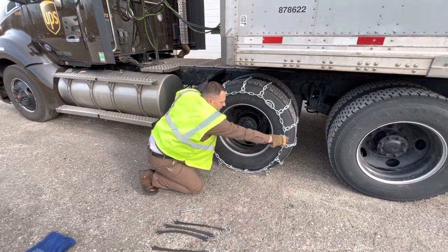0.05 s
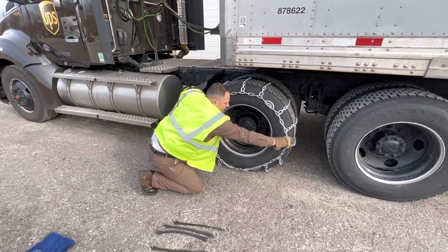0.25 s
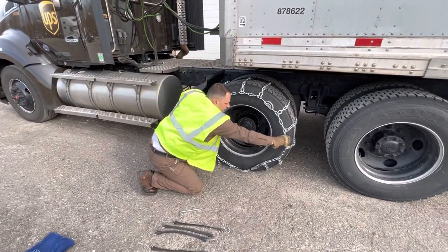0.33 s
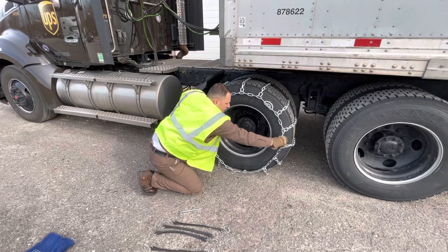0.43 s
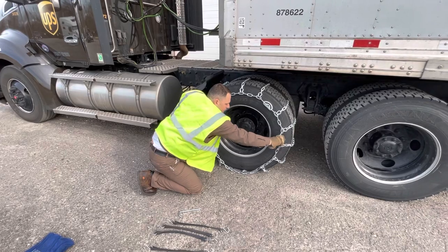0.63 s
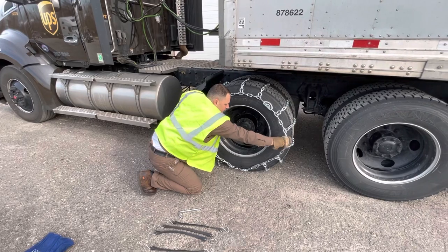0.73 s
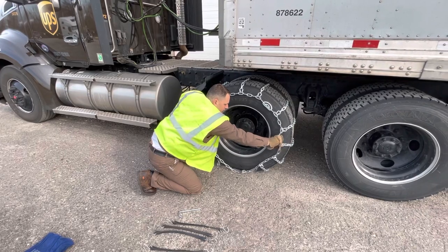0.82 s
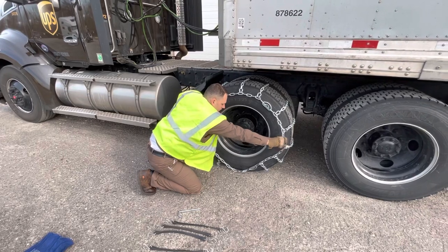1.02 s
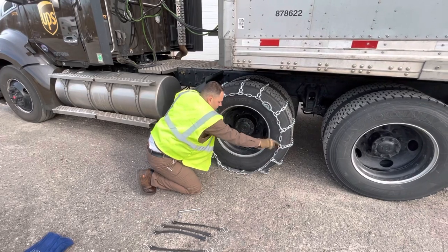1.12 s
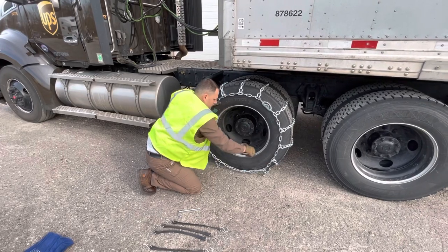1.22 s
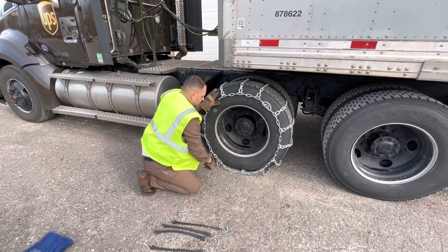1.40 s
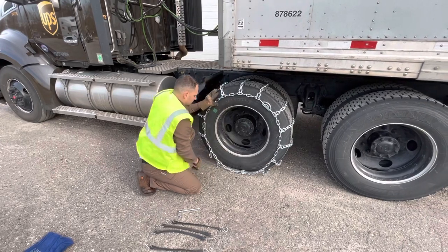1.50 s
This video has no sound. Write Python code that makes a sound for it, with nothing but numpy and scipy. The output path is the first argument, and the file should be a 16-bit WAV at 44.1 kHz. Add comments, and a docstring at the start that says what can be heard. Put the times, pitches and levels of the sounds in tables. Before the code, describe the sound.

A steel chain rattles against a truck tyre. After faint ticks, bright, dense link clashes start near 0.2 seconds and come in uneven bursts, with fine grating and hollow rubber thumps. The brightest ringing jangles come around 0.77 and 1.0 seconds. After 1.1 it slackens: light clinks near 1.2 and 1.3, thin pings fading. Outdoors, close, with short reflections and a faint low rumble.

```python
"""Outdoors, beside a truck: a steel snow chain is tugged along the side of a tyre.
Links clash in short flurries of contacts: noise bursts that also set off decaying ringing tones.
The links grate and rattle finely (many tiny contacts), and loose ones sing on as swelling, fading sines.
The chain slaps the rubber: soft pushes make the tyre's low tones thump, with a short knock of noise.
Under it lies a low rumble of filtered noise; reflections are a fading tail of noise."""
import sys
import numpy as np
from scipy import signal
from scipy.fft import rfft, irfft
from scipy.io import wavfile

SR = 44100
rng = np.random.default_rng(int(sys.argv[2]) if len(sys.argv) > 2 else 0)


def to_wav(s):
    """Save 16-bit WAV."""
    ch = np.atleast_2d(s).T  # columns
    pcm = np.round(np.clip(ch, -1, 1) * 32767)  # PCM
    wavfile.write(sys.argv[1], SR, pcm.astype(np.int16))


N = 68355  # length of the scene [samples]

# ringing tones of the steel links: (frequency [Hz], relative level [dB])
LINK_MODES = [(3550, -2), (4576, -3), (5078, -2), (7434, -9), (7747, -5), (8326, 1), (9070, -11),
              (9615, -6), (9781, 2), (10354, 0), (10513, -7), (11047, -8), (11353, -11), (12912, -14),
              (15208, -2), (15396, 0), (15490, -1)]
# borders between the low, middle, high and top groups of link tones: (frequency [Hz])
GROUP_EDGES_HZ = [6000, 8700, 14000]
# tone colour of steel contact noise: (frequency [Hz], relative level [dB])
CONTACT_COLOUR = [(300, 0), (900, -2.5), (1500, -8.5), (2200, -7), (3400, 2.5), (6000, 0.5), (8000, -2),
                  (10500, 0.5), (12000, 2), (14000, -12.5), (16000, 9.5)]

EVENT_SIZE = 11025  # longest single event [samples]
AGE = np.arange(EVENT_SIZE) / SR  # time since the start of an event [s]
BLOW_S = .02  # the level of a blow is its energy spread over this time

# T60 is the time in which a sound fades by 60 dB
CRACK_T60_S = 0.0057
FREE_T60_S, JAMMED_T60_S = .19, .026  # a link hanging free, and one jammed under tension
LOW_RING_DB = -13  # the low link tones against the middle ones


def undb(db):
    """Turn decibels into a gain."""
    return 10 ** (np.asarray(db) / 20)


def unit(x):
    """Scale a sound to an average (rms) level of 1."""
    return x / np.sqrt(np.mean(x ** 2))


def blow(x, db):
    """Give a sound the energy of BLOW_S seconds at this level."""
    return x * undb(db) * np.sqrt(BLOW_S * SR / np.sum(x ** 2))


def fade(t60):
    """Smooth dying away: the same share is lost in every equal step of time."""
    return np.exp(-np.log(1000) * AGE / t60)


def add(out, start, x):
    """Mix a sound in at a time in seconds."""
    i = int(start * SR)
    out[i:i + len(x)] += x[:N - i]


def colour(x, points):
    """Filter a sound through (frequency [Hz], level [dB]) points, without any sound before its cause."""
    hz, db = np.array(points, float).T
    size = 1024
    grid_hz = np.arange(size // 2 + 1) * SR / size
    level_db = np.interp(np.log(grid_hz + 1), np.log(hz), db)
    # folding the cepstrum moves the whole response after time zero (minimum phase)
    cepstrum = irfft(np.log(undb(level_db)))
    cepstrum[1:size // 2] *= 2
    cepstrum[size // 2 + 1:] = 0
    response = irfft(np.exp(rfft(cepstrum)))
    return signal.fftconvolve(x, response)[:len(x)]


def ring(x, hz, t60):
    """One ringing tone set off by x, with a random sign so that tones do not pile up into a click."""
    radius = np.exp(-np.log(1000) / (t60 * SR))
    angle = 2 * np.pi * hz / SR
    sign = rng.choice([-1, 1])
    feedback = [1, -2 * radius * np.cos(angle), radius * radius]
    # the tiny offset avoids an input of exact zeros
    return sign * signal.lfilter([1, 0, -1], feedback, x + 1e-18)


def flurry(length, rate, count=32):
    """Contacts scattered at random over the length in seconds, strongest in the middle."""
    scatter_db = 0.5
    when = rng.random(count)  # place within the flurry, 0 to 1
    when[0] = 0
    sizes = undb(scatter_db * rng.standard_normal(count)) * rng.choice([-1, 1], count)
    sizes = sizes * (.5 + np.sin(np.pi * when))
    used = 1 + int(length * rate)  # at most count contacts exist
    places = (when * length * SR).astype(int)
    return np.bincount(places[:used], sizes[:used], EVENT_SIZE)


def crack():
    """Noise of one steel contact: a snap and a fainter, longer scatter."""
    scatter_t60_s, scatter_db = 0.052, -11
    envelope = fade(CRACK_T60_S) + undb(scatter_db) * fade(scatter_t60_s)
    return rng.standard_normal(EVENT_SIZE) * envelope


def air():
    """Low outdoor rumble: steady noise, strongest in the bass."""
    # tone colour of the background: (frequency [Hz], relative level [dB])
    air_colour = [(25, -20), (60, -3), (130, 5), (250, 1.5), (450, -1.5), (680, -1), (1100, -14.5),
                  (1800, -22.5), (9000, -41.5), (16000, -49.5)]
    air_db = -55
    return undb(air_db) * unit(colour(rng.standard_normal(N), air_colour))


def reflections(near):
    """Echoes from the truck and the ground: every sound smeared into a fading tail of noise."""
    echo_t60_s, echo_db = .16, -7
    echo = rng.standard_normal(EVENT_SIZE) * fade(echo_t60_s)
    return undb(echo_db) * signal.fftconvolve(near, echo / np.linalg.norm(echo))[:N]


def tap():
    """A small dull tap near the start: one crack sets off one quickly damped tone."""
    tap_s, tap_hz, tap_db = 0.05, 1040, -59.5
    out = np.zeros(N)
    add(out, tap_s, blow(ring(crack(), tap_hz, JAMMED_T60_S), tap_db))
    return out


def tyre_thump(force, centre_hz, centre_t60):
    """Hollow thump: soft pushes excite the tyre's tones, most of all those near the centre pitch."""
    # ringing tones of the tyre: (frequency [Hz])
    tyre_modes = [165, 205, 245, 275, 320, 374, 450, 535]
    side_t60_s, width_octaves = 0.089, .65
    centre_db = 3  # extra strength of the tone nearest the centre
    # random shift of the side tones in each slap, for a less tonal thump [share of the pitch]
    detuning = .05
    octaves = abs(np.log2(np.array(tyre_modes) / centre_hz))
    thump = np.zeros(EVENT_SIZE)
    for hz, away in zip(tyre_modes, octaves):
        weight = np.exp(-(away / width_octaves) ** 2)
        if away == octaves.min():
            mode = blow(ring(force, hz, centre_t60), centre_db)
            mode *= np.sqrt(centre_t60 / side_t60_s)  # a longer tone carries more energy
        else:
            detuned_hz = hz * (1 + detuning * rng.standard_normal())
            mode = blow(ring(force, detuned_hz, side_t60_s), 0)
        thump += weight * mode
    return thump


def tyre_knock(hits):
    """Short knock: every contact starts a quickly fading burst of coloured noise."""
    # tone colour of the knock: (frequency [Hz], relative level [dB])
    knock_colour = [(70, -27.5), (170, -15.5), (520, 4), (640, -6), (770, 4.5), (1050, -16), (1500, -21.5),
                    (3000, -27.5)]
    knock_t60_s = 0.042
    burst = rng.standard_normal(EVENT_SIZE) * fade(knock_t60_s)
    return colour(signal.fftconvolve(hits, burst)[:EVENT_SIZE], knock_colour)


def tyre():
    """Links land on the rubber: a knock and a hollow thump, whose pitch depends on the spot."""
    # slaps of the chain, levels ahead of the low cut: (time [s], length [s], thump level [dB],
    # centre of the thump [Hz], T60 of the tone nearest that centre [s], knock level [dB])
    slap_list = [(.168, .022, -43.5, 310, 0.055, -52), (0.303, 0.0088, -51, 295, 0.049, -45),
                 (0.316, 0.013, -35, 313, 0.13, -49.5), (0.375, .020, -45.5, 298, 0.064, -63),
                 (0.418, 0.038, -42, 257.4, 0.081, -54), (.544, .02, -41.5, 435, 0.17, -42.5),
                 (0.556, 0.023, -40.5, 250, .16, -45.5), (0.636, 0.0043, -43, 394, 0.017, -52),
                 (0.647, 0.015, -37, 287, 0.13, -51), (0.757, 0.013, -37.5, 310, 0.072, -46),
                 (0.766, .012, -38, 387, 0.25, -44.5), (0.847, 0.039, -39, 252, 0.13, -50.5),
                 (0.917, 0.014, -47, 310, 0.13, -65), (0.994, 0.01, -55.5, 310, 0.1, -45.5),
                 (1.009, .014, -36.5, 270, .11, -43.5), (1.287, 0.0022, -60, 300, .06, -52.5)]
    contacts_per_s = 400
    rubber_contact_s = .0012  # the rubber yields, so every push is soft
    low_cut_hz = 112  # thumps and knocks are thinned below this
    push = np.sin(np.pi * np.minimum(AGE / rubber_contact_s, 1)) ** 2
    out = np.zeros(N)
    for start, length, thump_db, centre_hz, centre_t60, knock_db in slap_list:
        hits = flurry(length, contacts_per_s)
        force = signal.fftconvolve(hits, push)[:EVENT_SIZE]
        thump = tyre_thump(force, centre_hz, centre_t60)
        add(out, start, blow(thump, thump_db) + blow(tyre_knock(hits), knock_db))
    return signal.sosfilt(signal.butter(2, low_cut_hz, "high", fs=SR, output="sos"), out)


def rattle(count=40):
    """Links slide over each other: many small contacts grate, tink at their own pitches and ring the chain."""
    # level of the grating, joined by straight lines: (time [s], level [dB])
    rattle_levels = [(0.158, -70), (0.186, -47.5), (.29, -55), (.33, -45), (.45, -49), (.49, -50.5),
                     (0.562, -46), (.71, -47.5), (.85, -43), (.92, -51), (1.049, -39), (1.099, -53.5),
                     (1.161, -65.5), (1.36, -59.5), (1.46, -72.5)]
    contacts_per_s, scatter_db = 1600, 3.5
    tink_t60_s = .022
    tink_db, ringing_db = -7, -9  # against the grating
    happens = rng.random(N) < contacts_per_s / SR
    sizes = undb(scatter_db * np.clip(rng.standard_normal(N), -2, 2))
    hits = happens * sizes * rng.choice([-1, 1], N)

    noise = signal.fftconvolve(abs(hits), fade(CRACK_T60_S))[:N] * rng.standard_normal(N)
    grating = colour(noise, CONTACT_COLOUR)

    link = rng.integers(0, count, N)  # which link each contact belongs to
    tinks = np.zeros(N)
    for k, hz in enumerate(rng.uniform(3000, 12500, count)):
        tinks += ring(hits * (link == k), hz, tink_t60_s)

    ringing = np.zeros(N)
    for hz, db in LINK_MODES:
        level_db = db + LOW_RING_DB * (hz < GROUP_EDGES_HZ[0])
        ringing += undb(level_db) * ring(hits, hz, FREE_T60_S)

    gain = undb(np.interp(np.arange(N) / SR, *np.array(rattle_levels).T))
    return gain * (unit(grating) + undb(tink_db) * unit(tinks) + undb(ringing_db) * unit(ringing))


def pings():
    """A link swings clear and sings one pure note, which swells and then fades."""
    # notes of single loose links: (time [s], frequency [Hz], level ahead of the swell and fade [dB])
    ping_list = [(.260, 5078, -56), (.515, 3550, -55), (.562, 5078, -51), (.605, 4576, -51),
                 (.670, 5078, -45), (.677, 4576, -49), (.774, 3550, -45), (.930, 4576, -56),
                 (.940, 5078, -49), (.980, 5078, -50), (1.022, 3550, -47), (1.191, 5078, -58),
                 (1.220, 8326, -53), (1.255, 8326, -55), (1.284, 8326, -52), (1.322, 8326, -44),
                 (1.324, 3550, -51), (1.335, 5078, -58), (1.368, 8326, -53)]
    rise_t60_s, fade_t60_s = .03, .2
    out = np.zeros(N)
    for start, hz, db in ping_list:
        note = np.sqrt(2) * np.sin(2 * np.pi * hz * AGE)
        add(out, start, undb(db) * note * (fade(fade_t60_s) - fade(rise_t60_s)))
    return out


def link_ring(scrape, jam_db):
    """Ring four pitch groups of links: jammed ones briefly and off pitch, pinched longer, free longest."""
    pinched_t60_s, free_db = .06, -14
    jammed_spread, pinched_spread = .025, .004  # random shift [share of the pitch]
    groups = np.zeros((4, EVENT_SIZE))
    for hz, db in LINK_MODES:
        jammed_hz = hz * (1 + jammed_spread * rng.uniform(-0.93, 1))
        pinched_hz = hz * (1 + pinched_spread * rng.standard_normal())
        jammed = ring(scrape, jammed_hz, JAMMED_T60_S)
        pinched = ring(scrape, pinched_hz, pinched_t60_s)
        free = ring(scrape, hz, FREE_T60_S)
        group = np.searchsorted(GROUP_EDGES_HZ, hz)
        groups[group] += undb(db) * (undb(jam_db) * jammed + pinched + undb(free_db) * free)
    return groups


def clashes():
    """Steel links clash: each flurry of contacts makes noise and sets the links ringing."""
    # clashes of links: (time [s], flurry length [s], contact noise level [dB],
    # ring level of the middle tones [dB], of the high tones [dB], of the top tones [dB])
    clash_list = [ (.033, 0.0015, -58.5, -88, -68, -90), (.066, 0.0012, -61.5, -74, -87, -90),
                  (0.187, 0.016, -39.5, -82, -70, -80), (0.222, .012, -41.5, -44.5, -35, -50),
                  (.280, 0.01, -49, -52, -46, -70), (.3058, .001, -44.5, -46.5, -43, -75),
                  (.322, 0.016, -37, -55, -37.5, -68), (.351, .014, -42, -43.5, -43, -52),
                  (.380, .003, -38, -45.5, -65, -37), (.420, 0.0057, -38.5, -51, -67, -72),
                  (0.437, 0.014, -41.5, -52.5, -41.5, -37.5), (.531, .004, -49, -48.5, -42.5, -68),
                  (0.542, 0.016, -37.5, -50, -35.5, -71), (0.562, 0.01, -40, -41.5, -35, -66),
                  (0.606, 0.018, -39, -44.5, -45, -64), (0.673, .012, -67, -77, -40.5, -50),
                  (0.732, 0.002, -60, -52, -42, -66), (.744, 0.012, -41, -47.5, -42.5, -67),
                  (.766, 0.008, -34, -65, -33.5, -56), (0.772, .014, -44, -37.5, -27.5, -58),
                  (.945, 0.034, -65, -62, -48, -45), (.988, .02, -53, -43.5, -38.5, -61),
                  (1.004, 0.016, -42, -29.5, -26, -62), (1.072, .014, -40.5, -41, -48.5, -41.5),
                  (1.126, 0.0068, -59, -78, -50.5, -57), (1.181, 0.0018, -60, -64, -60, -77),
                  (1.191, .005, -51, -64, -51.5, -77), (1.2858, 0.0057, -53, -55, -58, -86),
                  (1.321, 0.011, -46.5, -54, -48.5, -80)]
    contacts_per_s = 950
    jammed_db = 3.5  # jammed links against pinched ones
    slack_s, slack_db = 1.11, -12  # the hand lets go, and from then on jammed links ring less
    out = np.zeros(N)
    for start, length, noise_db, middle_db, high_db, top_db in clash_list:
        ring_db = [middle_db + LOW_RING_DB, middle_db, high_db, top_db]
        jam_db = jammed_db + slack_db * (start > slack_s)
        scrape = signal.fftconvolve(flurry(length, contacts_per_s), crack())[:EVENT_SIZE]
        clash = blow(colour(scrape, CONTACT_COLOUR), noise_db)
        for tones, db in zip(link_ring(scrape, jam_db), ring_db):
            clash += blow(tones, db)
        add(out, start, clash)
    return out


def scene():
    """Chain and tyre, their reflections, and the background."""
    near = tap() + tyre() + rattle() + pings() + clashes()
    return (near + reflections(near) + air())[None]


def record(dry):
    """The recorder cuts the top: a steep filter removes the highest treble."""
    top_hz = 15700
    return signal.sosfilt(signal.ellip(12, .2, 70, top_hz, fs=SR, output="sos"), dry)


dry = scene()
out = record(dry)
to_wav(out)
```